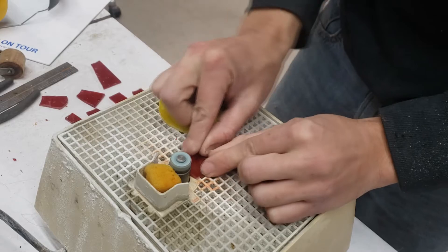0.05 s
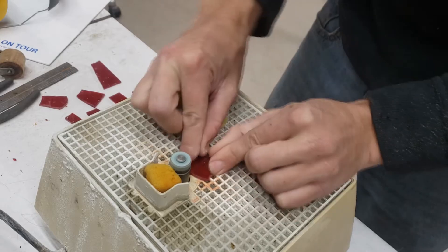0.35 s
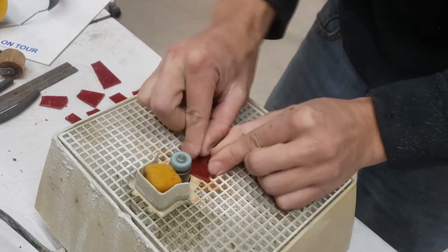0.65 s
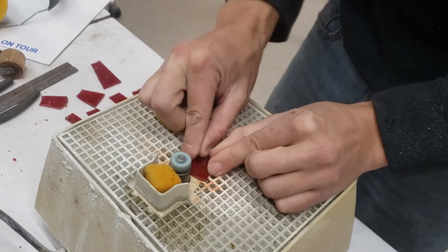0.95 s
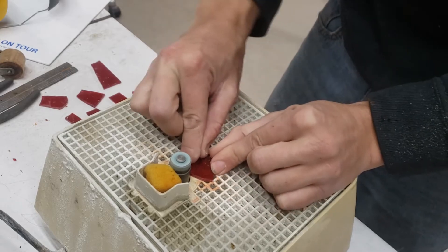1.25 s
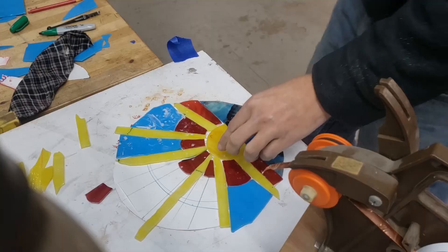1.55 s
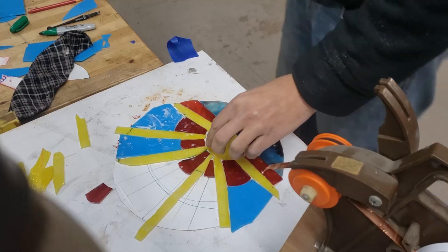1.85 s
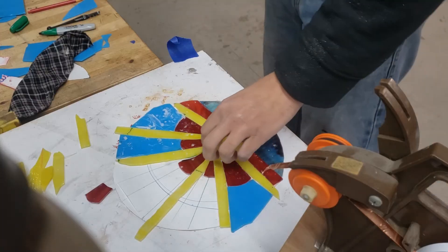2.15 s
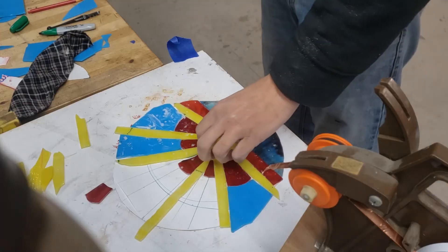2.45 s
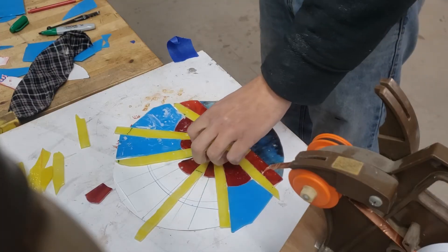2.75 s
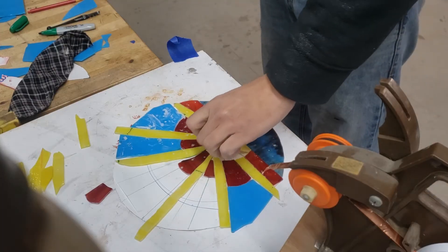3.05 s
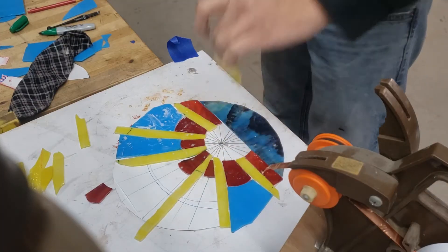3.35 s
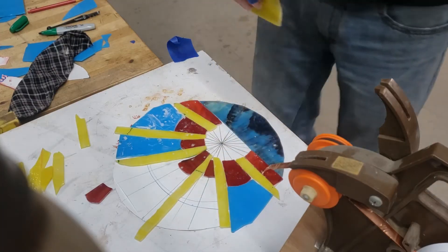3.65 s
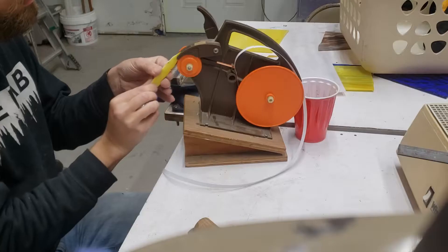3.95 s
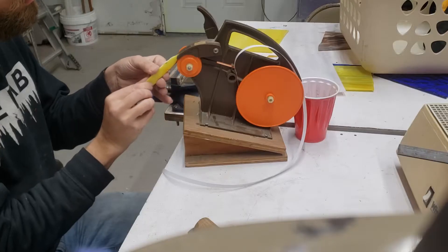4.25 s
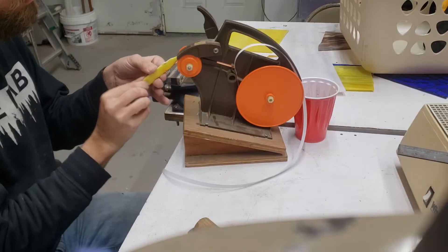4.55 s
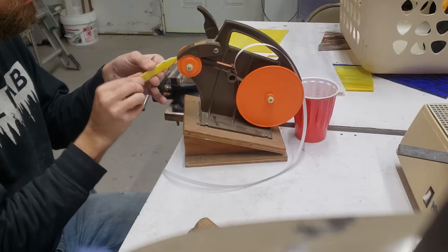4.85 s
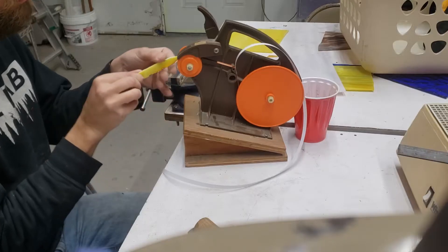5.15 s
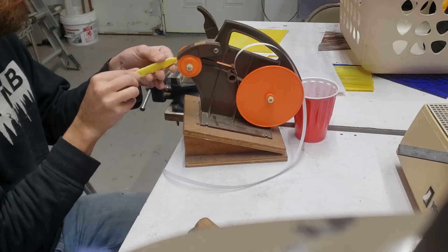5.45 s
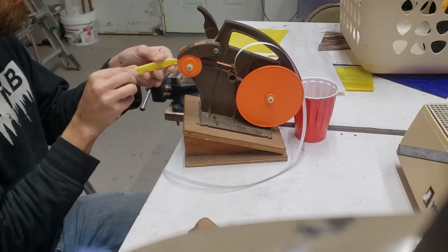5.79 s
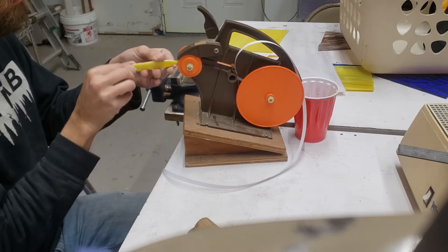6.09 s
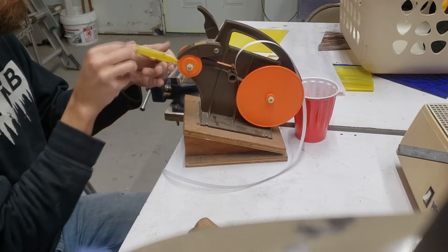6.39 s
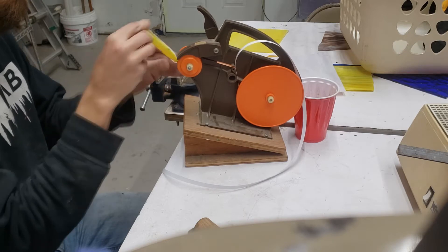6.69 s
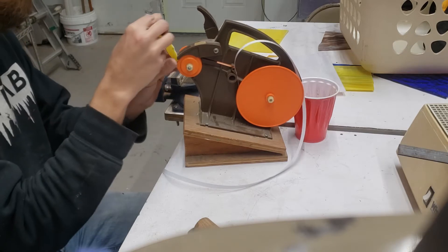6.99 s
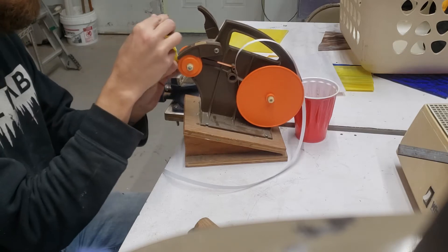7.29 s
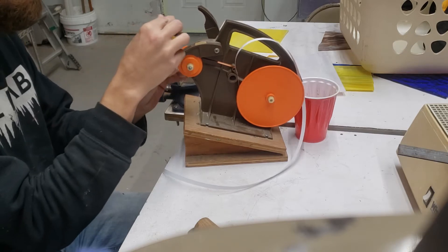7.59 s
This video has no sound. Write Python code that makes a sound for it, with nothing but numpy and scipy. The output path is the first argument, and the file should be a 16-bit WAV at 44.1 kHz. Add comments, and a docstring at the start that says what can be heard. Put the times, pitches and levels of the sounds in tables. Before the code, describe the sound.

A bench grinder is already running loudly and close by in a small workshop, its motor humming and its housing churning. Glass is pressed against the bit until about 0.65 seconds and again from 0.85 to 1.4, making a gritty rasp and high fizz with a thin glassy ring. At 1.5 seconds the grinder cuts off abruptly, and everything after is much quieter. A dull knock on the wooden bench comes at 1.7, with faint sliding of glass on paper. Near 2.9 a piece of glass clacks down, followed by light chinks. From about 3.9 a glass strip ticks and slides against a small wheel, sharpest at 4.3 and 5 seconds, with faint scrapes until 6. Softer ticks and dull knocks follow from 6.7 to 7.7. The handling has a short room echo, over a low, gently swelling rumble, soft air and a very faint high electrical buzz.

```python
"""A small workshop: stained glass is pressed twice against the diamond bit of a bench grinder. The motor hums,
the housing churns, and the grit rasps, fizzes and sets the glass ringing. The grinding breaks off at 1.5 s; in
the quiet, glass clacks down on a paper pattern, then a strip ticks and slides at a foiling wheel, with dull
knocks on the bench and a short room echo. Under the handling lie a low rumble, room air and a faint, high mains
buzz, whose colour changes at 3.7 s."""
import sys
import numpy as np
from scipy import signal
from scipy.fft import rfft, irfft, next_fast_len
from scipy.io import wavfile
from scipy.ndimage import uniform_filter1d, map_coordinates

SR = 44100
rng = np.random.default_rng(int(sys.argv[2]) if len(sys.argv) > 2 else 0)


def unload_audio(sound):
    """Save the sound as a 16-bit wav file, at the path given as the first command line argument."""
    columns = np.transpose(np.atleast_2d(sound))
    # keep every value between -1 and 1, then stretch to whole-number steps
    steps = np.round(np.clip(columns, -1, 1) * 32767)
    wavfile.write(sys.argv[1], SR, steps.astype(np.int16))


N = 340893
T = np.arange(N) / SR
GRINDING_END_S, BACKGROUND_CHANGE_S = 1.524, 3.735

# spindle speed: t/s, speed/Hz
SPINDLE_SPEED = [(0, 58.5), (.12, 58.1), (.31, 58.1), (.44, 58.7), (.77, 58.8), (1.07, 58.25), (1.24, 58.3),
                 (1.44, 58.9)]
# motor hum: multiple of the spindle speed, relative level/dB
HUM_ORDERS = [(1, -11.5), (2, -4), (3, -14.5), (4, 8), (5, -6), (6, -13), (7, -16), (8, -12), (9, -18),
              (10, -18.5), (11, -16), (12, -20.5), (13, -27)]
# glass against the bit: touch/s, ease off/s, lift/s, level/dB, easing drop/dB, rasp trim/dB, fizz trim/dB
PASSES = [(-.4, .495, 0.652, -27, 2.5, -4, 0.85), (.853, 1.312, 1.4286, -28, 5.5, -3, 3.5)]
# EQ of the midrange rasp, bright grit, top fizz, and churn of housing and wet bit: f/Hz, gain/dB
RASP_EQ = [(240, -36), (400, -14.5), (435, -14), (466, -6.5), (552, -9), (634, -5.5), (822, -9),
           (1080, -1.5), (1170, -9.5), (1430, -3), (1680, -0.5), (2100, 1.5), (2500, -13), (3250, -41),
           (5500, -120)]
GRIT_EQ = [(1400, -35.5), (2300, -7), (2700, -4), (2930, -3), (3300, -2.5), (4150, -1.5), (4450, -1),
           (4800, -3.5), (5080, -5.5), (5330, 0.5), (5600, -5.5), (6000, 0), (6900, -2), (7600, -6),
           (8500, -14.5), (11000, -38)]
FIZZ_EQ = [(6500, -27), (8600, 0.5), (10500, 1.5), (13500, -1.5), (15000, 3.5), (16000, 2.5)]
CHURN_EQ = [(30, -21.5), (60, -7), (120, -5.5), (190, -0.5), (260, -1.5), (340, -3.5), (500, -16.5),
            (900, -20), (1900, -21), (3500, -24.5), (7000, -38), (16000, -44)]
# high ring of the ground glass: f/Hz, width/Hz, relative level/dB, left-right/dB
SQUEAL_MODES = [(7986, 50, 2, -3.5), (15600, 150, 2, -6), (15660, 230, 3.5, 1)]
# held glass, damped by each grip: f/Hz, width/Hz, first pass trim/dB, second pass trim/dB
HELD_MODES = [(469, 18, -22, -17.5), (1039.5, 55, -15, -11), (1110.4, 20, -17, -12), (1526, 22, -13, -17.5),
              (1683, 22, -10, -10), (1908, 25, -12.5, -14), (2150, 24, -7, -13), (2580, 120, -13.5, -16),
              (3170, 150, -9.5, -16), (3900, 190, -11, -11.5), (4770, 45, -9.5, -14.5),
              (5364, 85, -11.5, -13), (6340, 140, -14, -2.5), (7020, 180, -11, -4)]
# grinder's stereo width: f/Hz, left-right correlation
GRINDER_IMAGE = [(60, 1.07), (290, 0.62), (640, 0.4), (1410, 0.45), (3100, 0), (15000, -0.14)]
# grinder's balance: f/Hz, left-right/dB
GRINDER_PAN = [(100, 3.5), (200, -1), (700, -0.5), (1290, -6.5), (2100, -1.5), (3000, -5), (4400, -10),
               (5000, -7.5), (5800, -13), (7000, -9.5), (8600, 3), (10500, -4), (13500, 2.5), (16000, -2)]
# glass set down and let go: t/s, level/dB, edge (0 lands flat, 1 edge to edge), left-right/dB
LANDINGS = [(2.929, -42, 0.19, -6), (2.934, -46, 0.12, -8), (2.954, -48, 0.054, 17),
            (3.08, -61.5, 0.92, -10), (3.154, -52.5, 1, -18), (3.165, -53, 0.97, -8)]
# its modes: f/Hz, base gain/dB (doubled when flat), offset on edge/dB, t60/s
PANE_MODES = [(200.4, -0.5, -37, 0.18), (318, -3.5, -37, 0.22), (433, 0.5, -20, 0.058),
              (943, -2, -30, 0.093), (1320, -7.5, -30, 0.12), (3240, -19, 5, 0.076),
              (3400, -8.5, -14, 0.045), (3560, -18, -22, .05), (5650, -27, -9, .06), (6080, -27, 8, .06),
              (8200, -16, -13, .1), (9330, -4.5, -19, 0.04), (9920, -34, -8, .05), (10660, -13, 6, .05)]
# EQ of a flat clack, an edge chink and the glass strip: f/Hz, gain/dB
CLACK_EQ = [(150, -20), (400, 5), (650, 2), (950, -3), (1800, -8), (2600, -26), (6000, -38), (16000, -37)]
CHINK_EQ = [(500, -27), (1700, -7), (4200, -21), (6200, 4.5), (9000, -13), (13000, 3), (16000, 0.5)]
STRIP_EQ = [(500, 1.5), (1000, -6), (1420, 4), (2100, -15), (2850, 0), (3300, -8), (4450, 5), (5300, -8),
            (6800, 7), (7800, -16), (9300, -2), (11300, 3), (13000, 4), (16000, -2.5)]
# strip ticking on the wheel: t/s, level/dB, tilt/(dB per octave), left-right/dB
TICKS = [(3.922, -55, 0, 9), (4.3259, -39, 15, 0), (4.958, -52.5, -3, 10), (4.9692, -36.5, 3.5, -2),
         (4.9704, -36.5, 2.5, 10), (5.3282, -56, -2.5, 7), (6.048, -60, 0, 6), (6.42, -59, 2, 6),
         (6.7316, -48.5, 0.5, 6), (7.02, -49.5, -5, 4), (7.5603, -58, 2, 5), (7.583, -50, -4, 7),
         (7.672, -49.5, -2.5, 4)]
# glass sliding on the pattern, then in the wheel's groove: t/s, length/s, hiss/dB, ring f/Hz, ring/dB
SLIDES = [(1.621, 0.14, -75, 6460, -82), (2.203, .13, -74, 5660, -78), (2.717, 0.073, -76, 6500, -82),
          (3.933, 0.12, -81, 6900, -77), (4.124, 0.057, -68, 1280, -80), (4.188, 0.047, -73, 3140, -76),
          (4.595, 0.093, -73, 1500, -81), (4.948, 0.092, -75, 4560, -69), (5.35, 0.038, -71, 1450, -70),
          (5.407, 0.062, -71, 11000, -69), (5.611, .075, -66, 1390, -68.5), (5.785, 0.11, -70, 4600, -82),
          (5.858, 0.034, -71, 4670, -68), (6.736, .08, -78, 6670, -73), (6.994, .16, -75, 2870, -79.5),
          (7.0, 0.13, -75, 1426, -75), (7.469, 0.07, -75, 2870, -70)]
# knocks on the bench: t/s, level/dB, peak f/Hz, t60/s
KNOCKS = [(1.711, -42, 245, 0.22), (2.181, -56, 550, 0.32), (2.929, -43, 205, 0.1), (3.442, -57, 448, 0.36),
          (4.976, -57, 478, 0.23), (7.131, -52.5, 261, 0.11), (7.42, -60.5, 246, 0.36)]
# workshop echo: f/Hz, t60/s
ROOM_T60 = [(100, 0.94), (1000, 0.51), (5000, 0.38), (16000, 0.36)]
# swells as the worker shifts weight and as the wheel drums through the bench: t/s, length/s, level/dB
WEIGHT_SHIFTS = [(1.45, 0.67, -55), (2.28, 0.51, -57), (2.92, .32, -51), (3.3, .42, -46.5),
                 (4.33, .32, -63)]
WHEEL_ROLLS = [(3.76, 0.34, -60), (4.9, 0.4, -60.5), (5.26, 0.91, -57), (6.57, 0.73, -59),
               (7.12, 0.85, -56)]
# EQ of the three rumble bands, and of the air before and after 3.7 s: f/Hz, gain/dB
DEEP_EQ = [(15, -39), (32, -19.5), (50, 6), (70, 11), (90, -43), (200, -55)]
BOOM_EQ = [(50, -42), (82, -12.5), (101, 6), (122, -9), (180, -19), (400, -53)]
BODY_EQ = [(100, -47), (170, -9), (255, 6), (420, -16), (700, -21.5), (2000, -70)]
EARLY_AIR_EQ = [(59, -30), (100, -1), (302, -13.5), (1200, -33.5), (1950, -31.5), (2630, -39.5),
                (3860, -40), (5190, -42), (5770, -37), (7610, -40.5), (8280, -50), (11200, -34.5),
                (12400, -39.5), (13200, -25), (16000, -32.5)]
LATE_AIR_EQ = [(100, -1), (200, -4.5), (300, -5), (450, -10.5), (700, -20), (1300, -24), (3000, -31),
               (5300, -34.5), (7600, -28), (8300, -55), (9400, -34.5), (11200, -18), (12300, -26),
               (15800, -27.5)]
# room's stereo width: f/Hz, left-right correlation
ROOM_IMAGE = [(60, 0.95), (150, 0.94), (300, 0.77), (700, 0.079), (2000, 0.05), (15000, 0.052)]
# mains buzz: f/Hz, width/Hz, level before 3.7 s/dB, level after/dB
BUZZ_MODES = [(3851, 270, -96, -95), (5755, 310, -93.5, -105), (7650, 140, -102, -91),
              (11450, 59, -88, -80), (13450, 150, -81, -82), (15550, 200, -79.5, -92)]


def grinder():
    """The motor hums on its spindle orders and shakes the housing while the glass is ground."""
    t = T[:round((GRINDING_END_S + .05) * SR)]
    turns = np.cumsum(np.interp(t, *np.transpose(SPINDLE_SPEED))) / SR
    hum = sum(amp(db + 2 * waver(len(t), hz=7.6)) * np.cos(2 * np.pi * (order * turns + rng.random()))
              for order, db in HUM_ORDERS)
    churn = stereo(diamonds(turns, memory=.37), CHURN_EQ, GRINDER_IMAGE, GRINDER_PAN)
    running = amp(-38) * unit(hum) + amp(-39.5) * churn + grinding(t, turns)
    out = np.zeros((2, N))
    add(out, 0, running * until(GRINDING_END_S, t))
    return out


def grinding(t, turns):
    """Grit scratches the glass and rings its modes; more hand pressure brightens the sound."""
    n = len(t)
    place = GRINDER_IMAGE, GRINDER_PAN
    bite = unit(1 + .5 * np.exp(-(turns % 1) / .08))  # the bit bites harder once a turn
    rasp = stereo(diamonds(turns, memory=.85), RASP_EQ, *place)
    grit = drifting_ripple(stereo(diamonds(turns, memory=.45), GRIT_EQ, *place))
    fizz = drifting_ripple(stereo(diamonds(turns, memory=.3) * bite, FIZZ_EQ, *place))
    scratch = diamonds(turns, memory=.4)
    squeal = sum(amp(db + waver(n, hz=14)) * pan(side) * resonate(scratch, hz, width)
                 for hz, width, db, side in SQUEAL_MODES)
    # the modes swell and sink as the fingers shift
    modes = [amp(2 * waver(n, hz=9.3)) * pan(curve(GRINDER_PAN, hz)) * resonate(scratch, hz, width)
             for hz, width, *_ in HELD_MODES]
    mode_hz, _, *grips = np.transpose(HELD_MODES)
    mode_slopes = .86 * np.log2(mode_hz / 1180)  # pressure drives high modes and damps low ones
    out = 0
    for (touch, ease, lift, level_db, drop_db, rasp_db, fizz_db), grip_db in zip(PASSES, grips):
        contact, pressure_db = hand(t, touch, ease, lift, drop_db)
        squeal_db = -8.5 + 7.5 * np.exp(-((t - lift) / .043) ** 2)  # rings freely as it leaves the bit
        # sound, trim/dB, dB per dB of pressure
        layers = [(rasp, rasp_db, .42), (grit, 1, .9), (fizz, fizz_db, 1.3), (squeal, squeal_db, .48),
                  *zip(modes, grip_db, mode_slopes)]
        out += contact * sum(amp(level_db + db + slope * pressure_db) * x for x, db, slope in layers)
    return out * amp(.6 * waver(n, hz=55))


def diamonds(turns, memory, points_per_turn=756):
    """The grit around the bit strikes the glass: each turn partly repeats the one before."""
    preroll_turns = 32
    strikes = rng.standard_normal((2, preroll_turns + 128, points_per_turn))
    track = signal.lfilter([1], [1, -memory], strikes, axis=1)[:, preroll_turns:].reshape(2, -1)
    return np.array([map_coordinates(side, [turns * points_per_turn], order=3) for side in track])


def hand(t, touch, ease, lift, drop_db, attack_s=.0049, lean_s=.1, ease_s=.04):
    """One pass: the contact envelope (0-1) and the pressure (dB) as the hand leans in and eases off."""
    held, gone = np.maximum(t - touch, 0), np.maximum(t - lift, 0)
    release_db = np.maximum(-481 * gone, -13 - 111 * gone)  # drops fast, then lingers in the room
    contact = np.minimum(held / attack_s, 1) * amp(release_db)
    pressure_db = -2.5 * np.exp(-held / lean_s) - drop_db * np.clip((t - ease) / ease_s, 0, 1)
    return contact, pressure_db


def drifting_ripple(x, depth_db=2.2):
    """A slow random ripple across the spectrum gives the hiss a faintly ringing, shifting colour."""
    bands = signal.stft(x, nperseg=1024, noverlap=768)[2]
    ripple = uniform_filter1d(rng.standard_normal(bands.shape[1:]), size=3, axis=0)
    ripple = unit(uniform_filter1d(ripple, size=36, axis=1))
    rippled = signal.istft(bands * amp(depth_db * ripple), nperseg=1024, noverlap=768)[1]
    return unit(rippled[:, :x.shape[1]])


def pane(t):
    """Glass clacks onto the pattern; where it is touched decides which modes ring."""
    out = np.zeros((2, N))
    attack = 1 - np.exp(-t / .001)  # the paper cushions the landing
    for start, db, edge, side in LANDINGS:
        clack, chink = eq(noise(len(t)), CLACK_EQ), eq(noise(len(t)), CHINK_EQ)
        contact = ((1 - edge) * clack + edge * chink) * decay(t, t60=.082)
        ring = 0
        for hz, base_db, edge_db, t60 in PANE_MODES:
            phase = rng.random() + rng.random((2, 1)) * min(hz / 2500, 1)  # high modes spread wider
            gain = amp((2 - edge) * base_db + edge * edge_db)
            ring += gain * np.sin(2 * np.pi * (hz * t + phase)) * decay(t, t60)
        add(out, start, amp(db) * pan(side) * (contact + amp(2.5) * ring) * attack)
    return out


def strip_ticks(t):
    """The strip's edge hits the wheel: a sharp snap with a faint tail."""
    out = np.zeros((2, N))
    envelope = decay(t, t60=.007) + amp(-18) * decay(t, t60=.07)
    for start, db, tilt, side in TICKS:
        tick = shaped(noise(len(t)), lambda f: amp(curve(STRIP_EQ, f) + tilt * np.log2((f + 100) / 3000)))
        add(out, start, amp(db) * pan(side) * tick * envelope)
    return out


def glass_slides():
    """Sliding glass sticks and slips, making a hiss and one finger-damped ring."""
    out = np.zeros((2, N))
    for start, length, hiss_db, hz, ring_db in SLIDES:
        n = round(length * SR)
        slips = noise(n) * amp(3.2 * waver(n, hz=600))
        rub = amp(hiss_db) * eq(slips, STRIP_EQ) + amp(ring_db - .5) * resonate(slips, hz, width=190)
        add(out, start, rub * np.hanning(n))
    return out


def bench_knocks(t):
    """Dull blows on the wooden bench, each a thud around one pitch."""
    out = np.zeros((2, N))
    attack = 1 - np.exp(-t / .0021)
    for start, db, hz, t60 in KNOCKS:
        hump = [(hz / 3, -25), (hz * .37, -9), (hz, 0), (hz * 1.56, -9), (hz * 2, -21), (hz * 10, -55)]
        thud = stereo(noise(len(t)), hump, ROOM_IMAGE)
        add(out, start, amp(db) * thud * decay(t, t60) * attack)
    return out


def room_echo(x):
    """The walls return a tail of sparse reflections, the highs dying first."""
    taps = noise(SR // 2) * (rng.random((2, SR // 2)) < .1)
    taps[:, :SR // 110] = 0  # the first wall answers after 9 ms
    hz, t, bands = signal.stft(taps, SR, nperseg=256)
    tail = signal.istft(bands * decay(t, curve(ROOM_T60, hz)[:, None]), SR, nperseg=256)[1]
    return signal.oaconvolve(x, tail / np.linalg.norm(tail[0]), axes=1)[:, :N]


def rumble():
    """Once the grinding ends, a faint rumble swells with shifting weight and the turning wheel."""
    shift, roll = swells(WEIGHT_SHIFTS, fade_s=.052), swells(WHEEL_ROLLS, fade_s=.1)
    out = 0
    for band, early_db, late_db, shift_db, roll_db in [(DEEP_EQ, -64, -65.5, 0, -3),
                                                          (BOOM_EQ, -72, -72.5, -13.5, 0),
                                                          (BODY_EQ, -74, -85, -19, -9.5)]:
        rest = early_to_late(amp(early_db), amp(late_db))
        level = np.sqrt(rest ** 2 + (amp(shift_db) * shift) ** 2 + (amp(roll_db) * roll) ** 2)
        out += level * stereo(noise(N), band, ROOM_IMAGE)
    return out * (1 - until(GRINDING_END_S, T))


def room_air():
    """A soft bed of air, whose colour changes at 3.7 s."""
    return early_to_late(amp(-62.5) * stereo(noise(N), EARLY_AIR_EQ, ROOM_IMAGE),
                            amp(-64) * stereo(noise(N), LATE_AIR_EQ, ROOM_IMAGE))


def mains_buzz(mains_hz=60):
    """A spike on every mains cycle rings a few high resonances."""
    spikes = np.sinc((T * mains_hz % 1 - .5) * SR / mains_hz)
    out = 0
    for hz, width, early_db, late_db in BUZZ_MODES:
        ring = resonate(spikes * (1 + .15 * noise(N)), hz, width)
        out += ring * early_to_late(amp(early_db), amp(late_db))
    return out


def amp(db):
    return 10 ** (np.asarray(db) / 20)


def unit(x):
    """Scales to rms 1."""
    return x / np.sqrt(np.mean(x ** 2) + 1e-30)


def noise(n):
    return rng.standard_normal((2, n))


def waver(n, hz):
    """Random modulation up to about hz, at rms 1."""
    return shaped(rng.standard_normal(n), lambda f: np.exp(-(f / hz) ** 2))


def curve(points, hz):
    """A curve's value at hz, on a log frequency axis."""
    f, value = np.transpose(points)
    return np.interp(np.log(hz + 1), np.log(f + 1), value)


def shaped(x, gain):
    """Filters x by the function gain(Hz), at rms 1."""
    n = x.shape[-1]
    size = next_fast_len(n, True)
    return unit(irfft(rfft(x, size) * gain(np.fft.rfftfreq(size, 1 / SR)), size)[..., :n])


def eq(x, points):
    """Colours x with an EQ curve, at rms 1."""
    return shaped(x, lambda f: amp(curve(points, f)))


def resonate(x, hz, width):
    """Rings x through a steep resonance, at rms 1."""
    return shaped(x, lambda f: 1 / (1 + 1j * (f - hz) / width) ** 2)


def stereo(x, colour, image, balance=((1, 0), (2, 0))):
    """Blends two unrelated signals into a pair with a given EQ, correlation and balance, at rms 1."""
    n = x.shape[-1]
    size = next_fast_len(n, True)
    (left, other), f = rfft(x, size), np.fft.rfftfreq(size, 1 / SR)
    correlation = np.clip(curve(image, f), -1, 1)
    right = correlation * left + np.sqrt(1 - correlation ** 2) * other
    pair = np.array([left, right]) * pan(curve(balance, f)) * amp(curve(colour, f))
    return unit(irfft(pair, size)[:, :n])


def pan(db):
    """Left and right gains, db apart at constant power."""
    return amp(np.array([[.5], [-.5]]) * db) / np.sqrt((amp(db) + amp(-db)) / 2)


def decay(t, t60):
    return amp(-60 * t / t60)


def swells(rows, fade_s):
    """Each movement fades in, holds and fades out."""
    return sum(amp(db) * np.clip(np.minimum(T - start, start + length - T) / fade_s, 0, 1)
               for start, length, db in rows)


def until(end, t):
    """1 before end, 0 after, with an 8 ms fade."""
    return np.clip((end - t) / .008 + .5, 0, 1)


def early_to_late(before, after):
    """A quick crossfade as the background changes."""
    early = until(BACKGROUND_CHANGE_S, T)
    return early * before + (1 - early) * after


def add(mix, start, sound):
    part = mix[:, max(round(start * SR), 0):][:, :sound.shape[1]]
    part += sound[:, :part.shape[1]]


def scene():
    """The grinder, the room's bed, and the handling with its echo."""
    machine = grinder()
    bed = room_air() + rumble() + mains_buzz()
    t = T[:SR // 2]  # half a second for each hit
    handling = bench_knocks(t) + pane(t) + strip_ticks(t) + glass_slides()
    return machine + bed + handling + amp(-5) * room_echo(handling)


def record(dry):
    """A steep high cut at 15.8 kHz."""
    high_cut = signal.firwin(601, 15800, window=("kaiser", 8), fs=SR)
    return signal.oaconvolve(dry, high_cut[None], "same", axes=1)


dry = scene()
out = record(dry)
unload_audio(out)
```